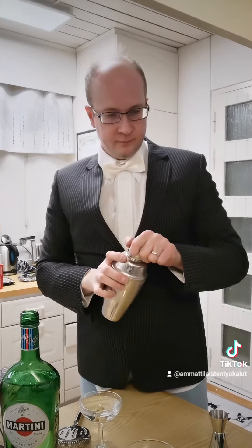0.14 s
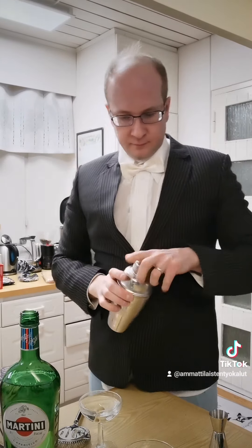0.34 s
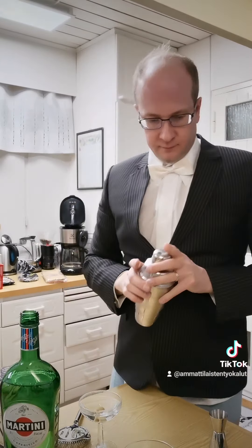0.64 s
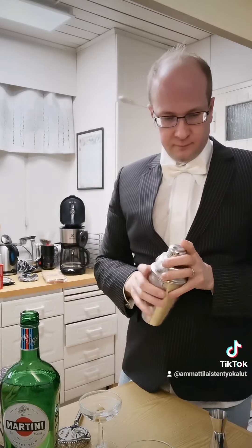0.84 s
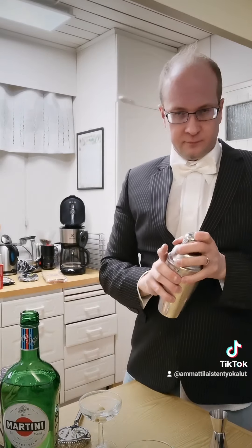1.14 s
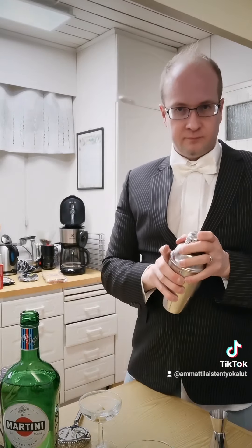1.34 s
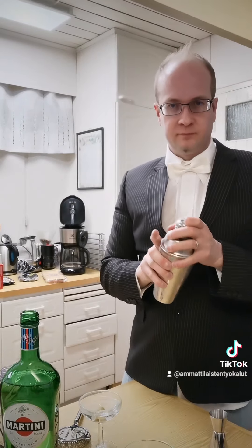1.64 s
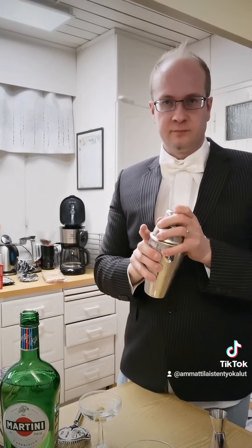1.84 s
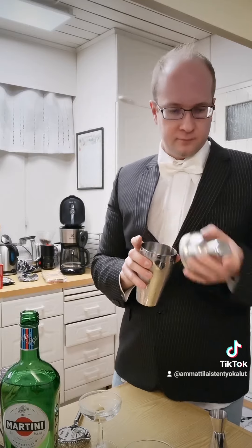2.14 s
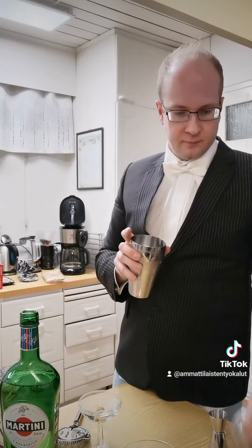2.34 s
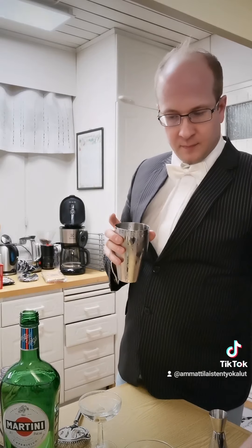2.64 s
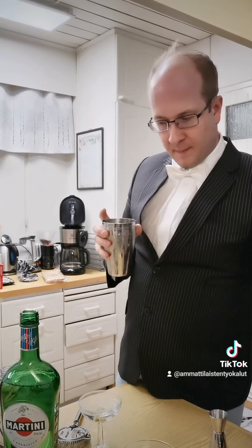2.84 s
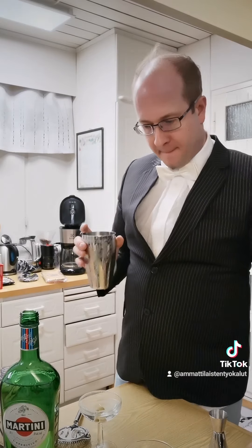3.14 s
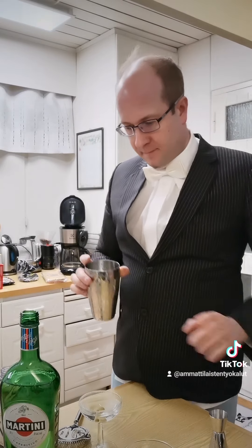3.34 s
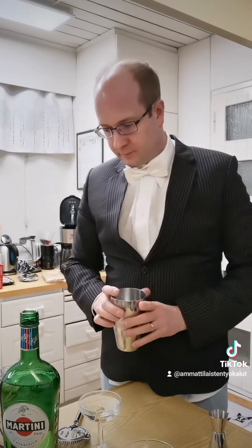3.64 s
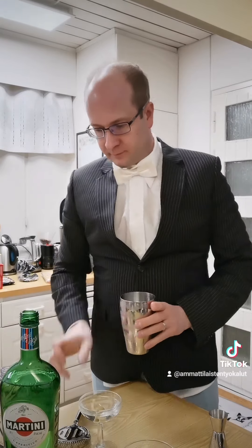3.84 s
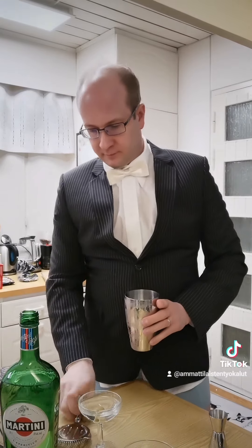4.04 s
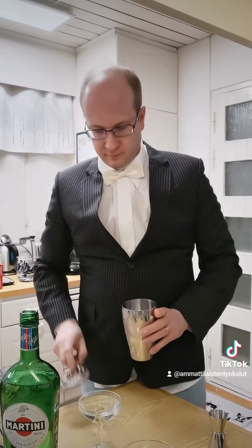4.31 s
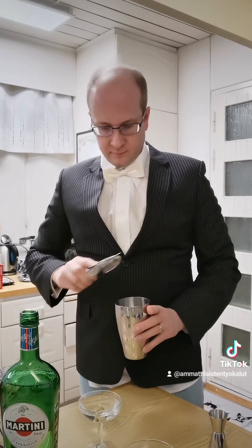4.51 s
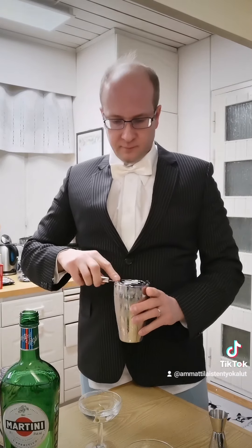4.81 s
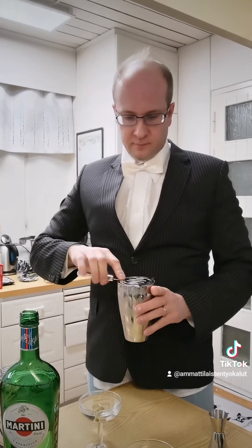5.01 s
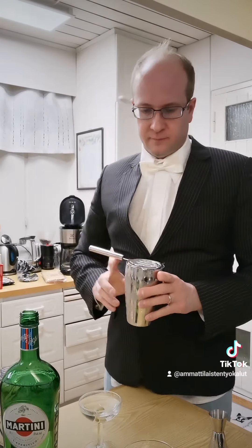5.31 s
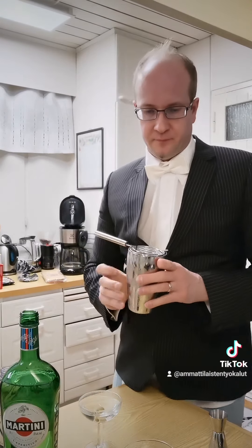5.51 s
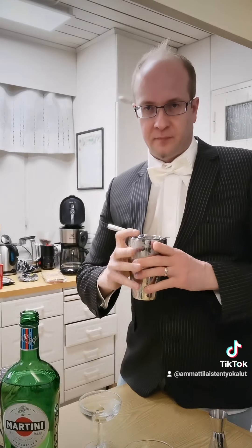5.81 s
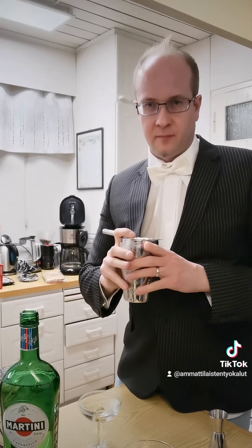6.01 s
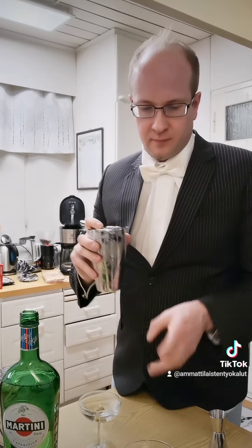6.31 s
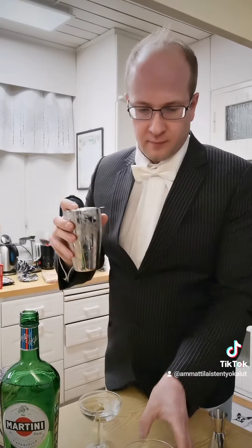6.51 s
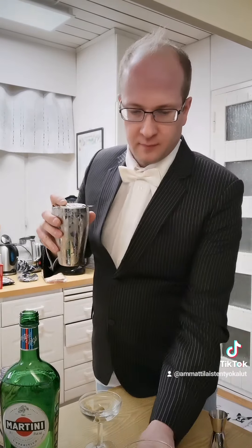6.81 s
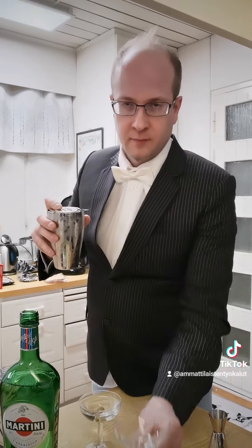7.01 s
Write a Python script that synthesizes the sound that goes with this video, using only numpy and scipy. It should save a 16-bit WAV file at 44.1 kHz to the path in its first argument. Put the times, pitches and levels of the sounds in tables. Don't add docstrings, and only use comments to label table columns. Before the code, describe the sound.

Wet ice clacks inside a lidded metal cup; the lid comes off with a clank and hard knock, then springy coil contacts and a soft glass tap.

```python
import sys
import numpy as np
from scipy import signal
from scipy.fft import rfft, irfft, next_fast_len
from scipy.io import wavfile
from scipy.ndimage import map_coordinates

SR = 44100
rng = np.random.default_rng(int(sys.argv[2]) if len(sys.argv) > 2 else 0)


def how_loud(loudness_db):
    steps = np.asarray(loudness_db, float) / 20
    return 10 ** steps


def store_wav(level_fs):
    pcm = np.round(np.clip(np.atleast_2d(level_fs), -1, 1) * 32767)
    wavfile.write(sys.argv[1], SR, pcm.T.astype(np.int16))


N = 315742

# pitch_hz, width_hz, level_db
LIDDED_WALL = [(3320, 73, 0), (4370, 250, 5), (4910, 24, 0), (6700, 56, -5)]
# pitch_hz, width_hz, level_db
CUP_AIR = [(904, 140, -0.5), (1268, 35, -27.5), (2600, 115, -28.5), (3980, 750, 1.5)]
# pitch_hz, level_db (per Hz)
ICE_CRACKLE = [(710, -53), (1200, -8.5), (1900, -11.3), (3510, -2), (4700, 0), (5410, -8), (8910, -13.5),
               (16000, -40)]
# time_s, pitch_hz
WALL_PITCH = [(0, 2180), (.4, 2070), (1.0, 2214), (1.2, 1918), (1.55, 1850), (2.2, 2000), (2.24, 2600)]
# start_s, peak_db, pitch_hz
CLACKS = [(1.07, -33.5, 950), (1.164, -28.5, 947), (1.324, -36, 931), (2.259, -34, 787),
          (2.29, -36.5, 1060), (2.338, -22, 921), (2.357, -29, 914), (2.372, -30.5, 830), (2.442, -31, 883),
          (2.552, -34, 877), (3.48, -36, 950), (3.508, -35, 900), (3.545, -39, 880), (3.579, -37, 850),
          (3.595, -41, 880), (3.648, -40, 900), (3.668, -41, 880), (1.205, -35, 950), (1.295, -38, 950),
          (5.998, -38, 900), (6.014, -37, 1000), (6.3, -38, 920), (6.412, -38, 900), (6.47, -37, 950),
          (6.49, -39, 950), (3.529, -34, 862), (3.621, -37, 900), (3.689, -30.5, 903), (3.721, -35, 911),
          (3.747, -39, 904), (3.821, -36, 908), (3.85, -33, 906), (3.896, -31, 923), (4.056, -39.5, 904),
          (4.166, -36, 931), (4.18, -35, 910), (5.023, -32, 1050), (5.118, -38, 900), (5.14, -33, 870),
          (5.159, -34, 924), (5.302, -36, 970), (5.495, -38.5, 924), (5.976, -38, 992),
          (6.234, -36.5, 1055), (6.256, -34, 986), (6.434, -38, 917), (6.552, -37, 1103)]
# start_s, peak_db, pitch_hz
LID_TICKS = [(0.105, -31, 2140), (0.1122, -27, 3900), (0.2659, -30, 5270), (0.253, -38, 6300),
             (0.304, -31, 4000), (0.362, -33, 4300), (1.2712, -33, 4010), (1.174, -28, 4300),
             (1.188, -30, 7500), (1.218, -32, 3900), (1.4109, -41, 3830), (1.4289, -39, 4730),
             (0.2803, -19, 4010), (0.2855, -22, 4090), (0.7045, -41, 4150), (0.7771, -42, 2190),
             (0.8278, -38.5, 2030), (0.883, -41, 4170), (0.9677, -39, 3160), (0.9938, -37, 8200),
             (1.0263, -30, 4600), (1.0364, -30, 2250), (1.0715, -29.5, 2200), (1.1199, -21.5, 4390),
             (1.1395, -19, 4510), (1.1455, -19, 4170), (1.1605, -24, 4050), (1.1934, -26.5, 1890),
             (1.288, -29, 4890), (1.3104, -33, 3640), (1.35, -35, 1870), (1.455, -35, 1850),
             (1.6435, -27, 2520), (1.8431, -33.5, 4590), (1.9907, -33, 5950), (2.0417, -28.5, 4400),
             (2.147, -30, 4350), (2.2168, -26, 3320), (2.2293, -25.5, 3970)]
# start_s, peak_db, pitch_hz
OPEN_TICKS = [(2.9202, -36, 6500), (5.9522, -42, 2500), (5.978, -38, 1600), (6.3323, -40, 2570),
              (6.3777, -39, 2560), (6.402, -38, 4500), (6.44, -32, 4200), (6.47, -33, 3500),
              (6.551, -36, 2000), (6.594, -40, 6000), (3.4396, -36, 2700), (3.5808, -44.5, 4710),
              (3.525, -44, 5000), (3.617, -45, 4900), (3.9094, -42.5, 2660), (4.1845, -43, 3320),
              (5.2565, -37, 3680), (5.5014, -40.5, 2700), (6.0364, -37, 3320), (6.073, -41, 2720),
              (6.1895, -30.5, 4800), (6.2236, -32, 2700), (6.2392, -29.5, 3900), (6.2561, -30.5, 2590),
              (6.4125, -33.5, 3950), (6.4335, -33, 2518), (6.5038, -29, 2670), (6.5262, -31, 4000),
              (6.577, -34, 4150)]
# start_s, peak_db, pitch_hz, die_away_s (to -60 dB)
TINKS = [(.993, -36, 7700, .04), (.994, -38, 8500, .03), (3.442, -40, 4500, .03), (2.903, -36, 4100, .06),
         (2.909, -44, 6150, .05), (2.921, -34, 4370, .06), (2.932, -38, 4900, .04), (3.283, -43, 4700, .04),
         (3.311, -40, 1700, .04), (3.312, -48, 4700, .05), (3.326, -34, 4250, .06), (3.328, -45, 3700, .04),
         (3.405, -50, 4200, .05)]
# time_s, left_over_right_db
CUP_PLACE = [(0.0, -6.5), (3.19, -3), (3.89, 16.5), (4.31, 3), (6.24, -6), (7.16, -8.5)]


def ice():
    air_gain, wall_gain, crackle_gain = stirring()
    now = np.arange(N) / SR
    air = resonant(dull(grains(170, 3.5, bed=0.8), hz=2500), CUP_AIR)
    cup = pair(air_gain * air, lag=4.2, pan_db=2)

    phase = 2 * np.pi * np.cumsum(np.interp(now, *np.transpose(WALL_PITCH))) / SR
    shake_a = dull(grains(90, 5.8, bed=0.35), hz=165)
    shake_b = dull(grains(90, 5.8, bed=0.35), hz=165)
    wall = unit(shake_a * np.cos(phase) + shake_b * np.sin(phase))
    cup += pair(wall_gain * wall, lag=1)

    lid_on = now < 2.25
    lidded = 0.73 * lid_on * resonant(grains(260, 2.1, bed=0.49), LIDDED_WALL)
    crackle = coloured(grains(750, 2.5, bed=1.3), ICE_CRACKLE)
    cup += pair(crackle_gain * (lidded + crackle), lag=6.4)

    t = np.arange(SR // 16) / SR
    for start_s, db, hz in CLACKS:
        modes = [(hz, 0.5, 0.05), (2.85 * hz, -17, 0.03)]
        left_right_gain = how_loud(db + np.array([[3], [0]]))
        add(cup, start_s, left_right_gain * ring(modes, t, 0.002, skew_db=-2))
    for start_s, db, hz in LID_TICKS + OPEN_TICKS:
        modes = [(hz, 0, 0.03), (0.72 * hz, -7, 0.025), (1.37 * hz, -7, 0.025)]
        steel = ring(modes, t, 0.00031, skew_db=4, rough=0.3)
        snap = 0.27 + 0.45 * how_loud(-60 * t / 0.005)
        chip = puff(ICE_CRACKLE, t, 0.03, alike_share=0.55) * snap
        add(cup, start_s, how_loud(db) * (0.4 * steel + chip))
    for start_s, db, hz, t60 in TINKS:
        add(cup, start_s, how_loud(db) * ring([(hz, 0, t60)], t, 0.002, rough=0.05))
    place_db = np.interp(now, *np.transpose(CUP_PLACE))
    return cup * how_loud(np.outer([0.5, -0.5], place_db))


# time_s, level_db
SWIRL = [(0, -58), (.45, -55), (.7, -60), (1.2, -55), (1.55, -63), (2.19, -56), (2.9, -66), (3.3, -57),
         (3.45, -56), (4.28, -56), (4.5, -68), (5.15, -55), (5.9, -62), (6.0, -49), (6.15, -57),
         (6.44, -50), (6.75, -57), (7.16, -66)]
# peak_s, crackle_db, rise_s (per 20 dB), fall_s (per 20 dB), wall_db
SURGES = [(0, -50, .1, .15, -54), (.2, -49, .3, .3, -49), (.46, -35.5, .22, .14, -55),
          (1.1, -46, .2, .05, -52), (1.152, -37, .08, .24, -43), (1.656, -54, .03, .07, -74),
          (1.84, -49, .02, .06, -68), (2.19, -50, .25, .4, -58), (3.32, -66, .02, .1, -76),
          (4.3, -44, .04, .06, -68), (5.3, -57, .05, .2, -62), (5.66, -37, .02, .065, -78),
          (6.0, -54, .04, .12, -57), (6.124, -46, .01, .17, -66), (6.442, -48, .08, .27, -54)]


def stirring():
    swirl = how_loud(np.interp(np.arange(N) / SR, *np.transpose(SWIRL)))
    shapes = np.array([swell(peak_s, 0, rise, fall) for peak_s, _, rise, fall, _ in SURGES])
    _, crackle_db, _, _, wall_db = np.transpose(SURGES)
    crackle, wall = how_loud([crackle_db, wall_db]) @ shapes
    clump_db = 3 * map_coordinates(rng.standard_normal(N // 100), [np.arange(N) * 30 / SR])
    crackle_gain = unit(how_loud(clump_db)) * (crackle + how_loud(-11) * swirl)
    return swirl + how_loud(-13) * crackle, wall + how_loud(-12) * swirl, crackle_gain


# start_s, peak_db
LID_DOWN = [(2.6332, -6)]
# pitch_hz, level_db, die_away_s (to -60 dB)
LID_NOTES = [(1080, -10, 0.09), (2212, -5, 0.09), (3320, -5, 0.022), (4380, -18, .06), (4850, -1.5, 0.055),
             (6370, -16, .05), (6620, -12, 0.028), (8533, -6, 0.035), (10200, -17, 0.09), (10940, -28, .1),
             (12100, -26, .1), (14100, -30, .07)]
# pitch_hz, level_db (per Hz)
LID_BURST = [(60, -18), (260, -3), (500, -8), (1200, -9), (2500, -15), (5600, -25), (9300, -38),
             (16000, -85)]
# start_s, peak_db, dull_above_hz
KNOCKS = [(2.949, -14, 15300), (2.9545, -21, 9000), (2.9605, -22, 12000), (2.976, -26, 6000),
          (2.986, -26, 5000), (2.994, -23, 6000), (3.0, -20.5, 5000), (3.03, -28, 5000), (3.09, -29, 3000),
          (3.297, -25, 750), (3.322, -30, 1000), (3.335, -28, 1100), (3.442, -22, 900), (3.485, -31, 700)]
# pitch_hz, level_db, die_away_s (to -60 dB)
KNOCK_NOTES = [(362, -7, 0.3), (517, -4, 0.3), (629, -7, 0.25), (715, -6, .25), (933, 2.5, 0.3),
               (1228, -2.5, .3), (1366, -2.5, .25), (1762, -5, .25), (1904, -4, 0.4), (2696, -1.5, 0.35),
               (3400, -7, 0.35), (4081, -10, .15), (4834, -9, 0.3), (6132, -5, .2)]
# pitch_hz, level_db (per Hz)
KNOCK_BURST = [(100, -38), (200, -19), (357, -12), (800, -7), (2600, -8), (8220, -22), (13700, -32),
               (16000, -78)]
# pitch_hz, level_db, die_away_s (to -60 dB)
TABLE_NOTES = [(92, -5, 0.25), (146, -9, 0.19), (190, -12, 0.3), (234, -10, 0.38), (274, -3, 0.22),
               (336, -14, .15), (418, -9, 0.16), (518, -14, .12), (732, -12, 0.08)]


def blows():
    out = np.zeros((2, N))
    t = np.arange(SR // 3) / SR
    for start_s, db in LID_DOWN:
        table = ring(TABLE_NOTES, t, 0.00082, rough=0.015)
        lid = ring(LID_NOTES, t, 0.0012, rough=0.1) * (1 + 2.2 * how_loud(-60 * t / 0.03))
        burst = puff(LID_BURST, t, 0.11, alike_share=0.72)
        add(out, start_s, how_loud(db - 5.5) * (table + lid) + how_loud(db - 6) * burst)
    t = t[:SR // 5]
    for start_s, db, hz in KNOCKS:
        hardness = hz / 15000
        steel = how_loud(-9) * np.sqrt(hardness) * ring(KNOCK_NOTES, t, 0.00036, rough=0.06)
        crack = 0.7 + 2.8 * how_loud(-60 * t / 0.03)
        burst = puff(KNOCK_BURST, t, 0.12, alike_share=0.81) * crack
        table = how_loud(-2.5) * hardness ** 2 * ring(TABLE_NOTES[3:4], t, 0.003, rough=0.01)
        shape = (1 - np.exp(-t * hz / 3)) * (1 - t / t[-1])
        add(out, start_s, how_loud(db) * dull((steel + burst + table) * shape, hz))
    return out


# start_s, peak_db, cup_body_db, cup_air_db, cup_air_hz
STRAINER_TOUCHES = [(4.334, -27, -53, -26.5, 1150), (4.857, -22.5, -19, -22, 930),
                    (4.9661, -23.5, -34, -27, 1250), (4.989, -30, -50, -33, 1100),
                    (4.998, -20.5, -37, -31, 970), (4.905, -31, -45, -38, 950),
                    (5.6503, -28.5, -57, -30, 1200), (5.6594, -31.5, -42, -38, 1150),
                    (6.126, -33, -57, -55, 1020)]
# pitch_hz, level_db, die_away_s (to -60 dB)
CUP_NOTES = [(518, -0.5, 0.14), (472, -8, 0.14)]
# pitch_hz, level_db, die_away_s (to -60 dB)
COIL_NOTES = [(2600, -1, 0.05), (3800, -3, 0.11), (4770, 3, 0.084), (5940, 1, 0.058), (7300, 5, 0.065),
              (9000, -4, .12)]
# pitch_hz, level_db (per Hz)
COIL_SHIVER = [(710, -19), (1200, -2.5), (2010, -21), (3710, 3.5), (5890, 0.5), (9030, 1), (15500, -9),
               (16500, -29)]
# peak_s, level_db, rise_s (per 20 dB), fall_s (per 20 dB), hold_s
COIL_LIFT = (4.29, -43, .06, .045, .048)
# peak_s, level_db, rise_s (per 20 dB), fall_s (same), hold_s
SLEEVE_BRUSH = (6.7, -66, .1, .15, .3)
# pitch_hz, level_db (per Hz)
DRAG_TONE = [(710, -40), (1200, -15), (1920, -9), (4780, -7), (5450, -16), (6940, -5.5), (14800, -21),
             (16500, -47)]


def strainer():
    sliding = swell(*COIL_LIFT) + swell(*SLEEVE_BRUSH)
    out = pair(sliding * coloured(grains(1200, 3, bed=1.1), DRAG_TONE), lag=2.7, pan_db=11.5)
    t = np.arange(SR // 4) / SR
    for start_s, db, body_db, air_db, air_hz in STRAINER_TOUCHES:
        shiver_s = 0.26 if db > -25 else 0.11
        turns = ring(COIL_NOTES, t, 0.0006, rough=0.2)
        shiver = puff(COIL_SHIVER, t, shiver_s, alike_share=0.4) * (1 - np.exp(-t / 0.00033))
        body = ring(CUP_NOTES, t, 0.0015, rough=0.041)
        air_notes = [(0.8 * air_hz, -6, 0.04), (air_hz, 0, 0.04), (1.15 * air_hz, -6, 0.03)]
        air = ring(air_notes, t, 0.00064, rough=0.9)
        coil = 0.29 * turns + 0.56 * shiver
        add(out, start_s, how_loud(db) * coil + how_loud(body_db + 4) * body + how_loud(air_db + 1.5) * air)
    return out


# start_s, peak_db
GLASS_DOWN = (7.031, -27.5)
# pitch_hz, level_db, die_away_s (to -60 dB)
GLASS_NOTES = [(450, 0.5, 0.17), (544, -1.5, 0.11), (1620, -18, 0.09), (1780, -16.5, 0.051)]


def glass():
    out = np.zeros((2, N))
    t = np.arange(SR // 4) / SR
    start_s, db = GLASS_DOWN
    add(out, start_s, how_loud(db) * ring(GLASS_NOTES, t, 0.0017, rough=0.1))
    return out


# start_s, peak_db, pitch_hz,
# die_away_s (to -60 dB), rustle_db
JOLTS = [(0.178, -39.5, 207, 0.11, -30), (1.639, -19.5, 210, 0.054, -34), (1.83, -29, 150.5, 0.12, -35),
         (1.996, -30.5, 202, 0.11, -35), (2.124, -41, 167, 0.21, -33), (2.216, -25, 208, 0.06, -27),
         (3.436, -29, 331, 0.05, -59), (3.4425, -20, 440, .04, -59)]
# peak_s, level_db, rise_s (per 20 dB), hold_s, fall_s (per 20 dB)
RUBS = [(.39, -37.5, .03, .12, .1), (4.195, -45, .02, .05, .04), (4.335, -42, .03, 0.001, .09)]
# pitch_hz, width_hz, level_db
RUB_BODY = [(244, 125, 9.5), (460, 12, 3)]
# pitch_hz, level_db (per Hz)
SWISH_TONE = [(710, -20), (1200, -8), (1470, -22), (3200, -6), (4700, 1), (6000, 0.5), (9000, -13),
              (16000, -38)]


def hands():
    out = np.zeros((2, N))
    t = np.arange(SR // 4) / SR
    for start_s, db, hz, t60, rustle_db in JOLTS:
        modes = [(0.76 * hz, -5, t60), (hz, 0, t60), (1.2 * hz, -3, 0.67 * t60), (2.0 * hz, -8, 0.49 * t60)]
        thud = ring(modes, t, 0.0015, rough=0.14)
        rustle = puff(ICE_CRACKLE, t, 0.084, alike_share=0.31) * (1 - np.exp(-t / 0.003))
        add(out, start_s, how_loud(db) * thud + how_loud(rustle_db - 6) * rustle)
    rubs = [swell(peak_s, db, rise, fall, hold) for peak_s, db, rise, hold, fall in RUBS]
    swish = how_loud(-0.5) * coloured(grains(1500, 3, bed=1.2), SWISH_TONE)
    out += pair(rubs[0] * swish, lag=4, pan_db=0.5)
    rubbing = resonant(dull(grains(150, 1, bed=0.88), hz=850), RUB_BODY)
    return out + pair(sum(rubs) * rubbing, lag=0.058)


# pitch_hz, die_away_s (to -60 dB)
ROOM_DECAY = [(150, 0.28), (1000, 0.55), (4000, 0.4), (12000, 0.24)]
# pitch_hz, likeness (1 = same)
ECHO_ALIKE = [(100, 1), (400, 0.77), (1500, 0.2), (8000, 0.15)]


def kitchen(x):
    out, hop = np.zeros((2, N)), SR // 3
    for start in range(0, N, hop):
        hz, t, noise = signal.stft(rng.standard_normal((2, SR * 2 // 3)), SR, nperseg=256)
        decay = how_loud(-60 * t / along(ROOM_DECAY, hz)[:, None])
        shaped = noise * decay * alike(ECHO_ALIKE, hz)[..., None]
        mid, side = signal.istft(shaped, SR, nperseg=256)[1]
        tail = np.array([mid + side, mid - side])
        tail = tail / np.linalg.norm(tail[0])
        piece = x[:, start:start + hop].mean(0)[None]
        add(out, start / SR + 0.004, signal.fftconvolve(piece, tail, axes=1))
    return out


# pitch_hz, level_db (per Hz)
AIR_TONE = [(25, 0), (50, -8), (250, -4), (669, -12), (902, -7), (1360, -22), (4730, -22.5), (16500, -39)]
# pitch_hz, likeness (1 = same)
AIR_ALIKE = [(60, 0.24), (240, 0.9), (950, -0.81), (3770, -2.06), (15000, -1.7)]


def background():
    now = np.arange(N) / SR
    noise = rng.standard_normal((2, N))
    mid, side = filtered(noise, lambda hz: how_loud(along(AIR_TONE, hz)) * alike(AIR_ALIKE, hz))
    air = how_loud(-53.5) * unit(np.array([mid + side, mid - side]))
    drift = map_coordinates(rng.standard_normal(80), [np.linspace(0, 79, N)])
    load = np.clip((now - 5.3) / 0.2, 0, 1)
    hum_gain = how_loud(-54.5 + 2.5 * load + 0.73 * drift)
    hum = hum_gain * np.sin(2 * np.pi * 89.2 * now + 0.22 * drift)
    return (air + hum) * how_loud([[1.5], [-1.5]])


def unit(x):
    return x / np.sqrt(np.mean(x ** 2) + 1e-20)


def along(points, hz):
    f, v = np.transpose(points)
    return np.interp(np.log(hz + 1), np.log(f + 1), v)


def filtered(x, response):
    m = next_fast_len(x.shape[-1] + 8192)
    spectrum = rfft(x, m) * response(np.fft.rfftfreq(m, 1 / SR))
    return irfft(spectrum, m)[..., :x.shape[-1]]


def resonant(x, peaks):
    def response(f):
        total = 0
        for k, (centre, width, db) in enumerate(peaks):
            loss = 1j * f * width
            total = total + (-1) ** k * how_loud(db) * loss / (centre * centre - f * f + loss)
        return total
    return unit(filtered(x, response))


def coloured(x, spectrum):
    return unit(filtered(x, lambda hz: how_loud(along(spectrum, hz))))


def dull(x, hz):
    return filtered(x, lambda f: 1 / (1 + 1j * f / hz) ** 2)


def grains(rate, spread_db, bed):
    hit, size = rng.random(N), rng.exponential(size=N)
    noise = rng.standard_normal((2, N))
    impacts = (hit < rate / SR) * how_loud(spread_db * np.minimum(size, 2.5)) * np.sign(noise[0])
    return unit(impacts) + bed * noise[1]


def pair(x, lag, pan_db=0):
    delayed = filtered(x, lambda hz: np.exp(-1j * np.pi * np.outer([lag, -lag], hz) / SR))
    return delayed * how_loud([[pan_db / 2], [-pan_db / 2]])


def ring(modes, t, attack, skew_db=2, rough=0.058):
    out = 0
    for hz, db, t60 in modes:
        size, turn = rng.standard_normal((2, 2, 1)) * np.clip(hz / 1500, 0, 1)
        wander = np.cumsum(rng.standard_normal(len(t))) * np.sqrt(rough * hz / SR)
        tone = np.sin(2 * np.pi * hz * t + 1.11 * turn + wander)
        out = out + how_loud(db + skew_db * size - 60 * t / t60) * tone
    return out * (1 - np.exp(-t / attack))


def puff(spectrum, t, t60, alike_share):
    noise = rng.standard_normal((3, len(t)))
    sides = noise[:2] * np.sqrt(1 - alike_share) + noise[2] * np.sqrt(alike_share)
    return coloured(sides, spectrum) * how_loud(-60 * t / t60)


def alike(likeness, hz):
    turn = np.arccos(np.clip(along(likeness, hz), 0, 1)) / 2
    return np.array([np.cos(turn), np.sin(turn)])


def swell(peak_s, db, rise, fall, hold=0):
    t = np.arange(N) / SR - peak_s
    steps_down = np.maximum(-t / rise, (t - hold) / fall)
    return how_loud(db - 20 * np.maximum(steps_down, 0))


def add(out, start_s, sound):
    part = out[:, round(start_s * SR):][:, :sound.shape[1]]
    part += sound[:, :part.shape[1]]


def scene():
    near = ice() + hands() + strainer() + glass()
    hard = blows()
    near = near + kitchen(how_loud(-4.5) * near)
    hard = hard + kitchen(how_loud(-1.4) * hard)
    events = near + pair(hard, lag=10.7)
    return filtered(events, lambda hz: (1j * hz / (65 + 1j * hz)) ** 4) + background()


def low_pass(x):
    return signal.sosfilt(signal.butter(12, 16800, fs=SR, output="sos"), x)


# pitch_hz, left_over_right_db
MICROPHONES = [(100, -3), (700, 1), (4000, -1.5), (8500, 8.5), (15000, -4)]


def record(dry):
    def microphone(hz):
        sides = how_loud(np.outer([0.5, -0.5], along(MICROPHONES, hz)))
        return sides * (hz < 15900) * how_loud(-3 * (hz > 9600))
    x = filtered(dry, microphone)
    hold = np.exp(-1 / (0.12 * SR))
    loudness = signal.lfilter([1 - hold], [1, -hold], np.abs(x).mean(0))
    bass = filtered(x, lambda hz: 1 / (1 + (hz / 120) ** 6))
    x = (x - bass) / (1 + loudness / 0.2) + bass / (1 + loudness / 0.08)
    mix = x / (1 + np.abs(x) ** 6) ** (1 / 6)
    return low_pass(mix)


dry = scene()
out = record(dry)
store_wav(out)
```